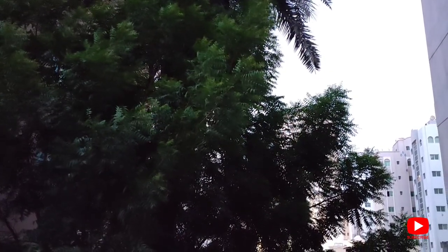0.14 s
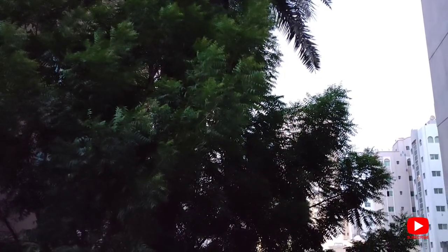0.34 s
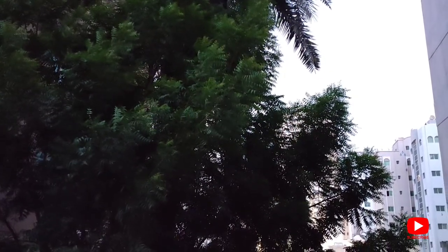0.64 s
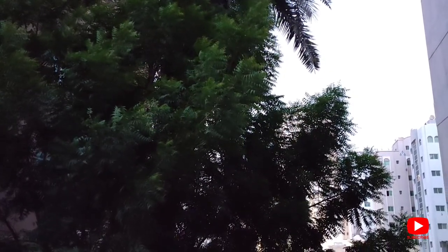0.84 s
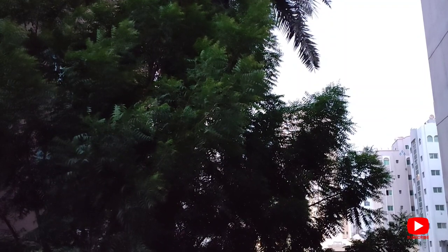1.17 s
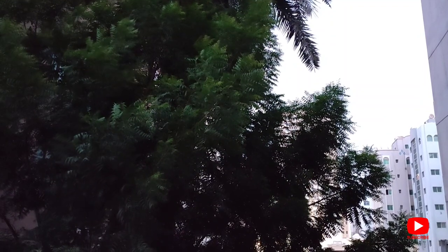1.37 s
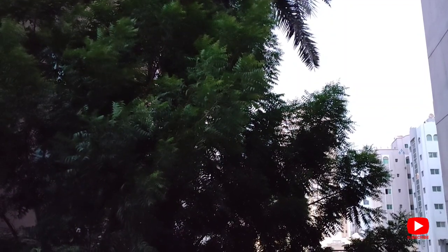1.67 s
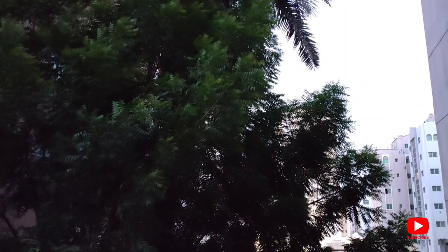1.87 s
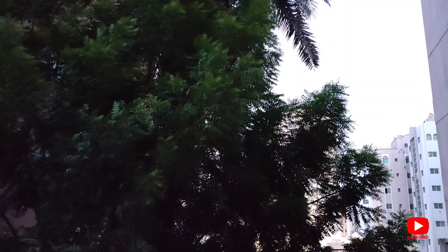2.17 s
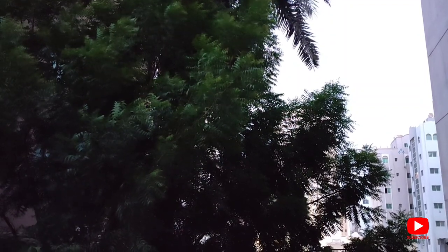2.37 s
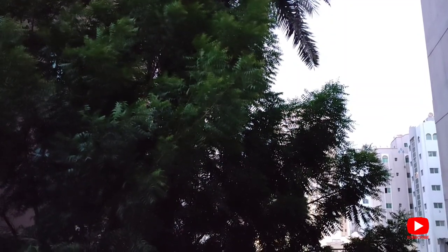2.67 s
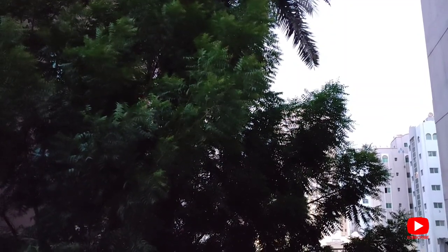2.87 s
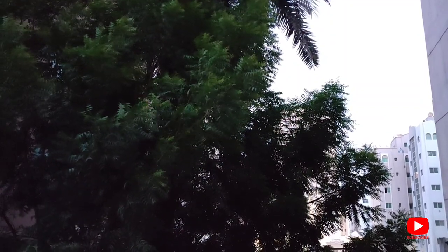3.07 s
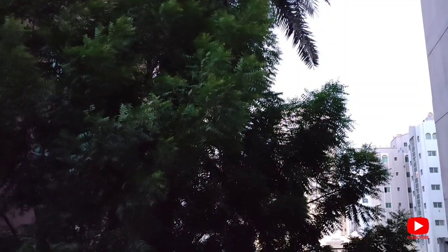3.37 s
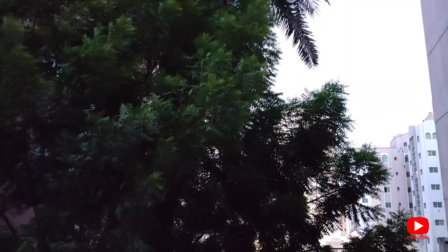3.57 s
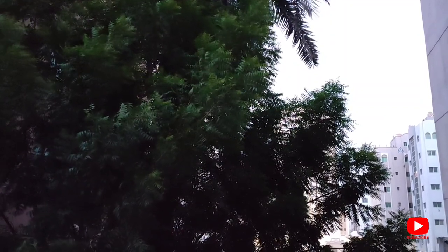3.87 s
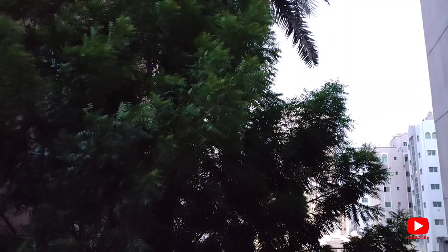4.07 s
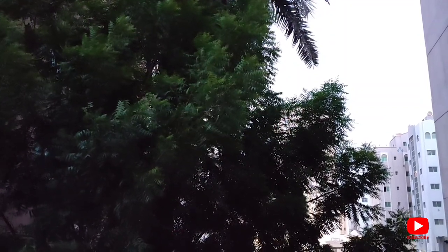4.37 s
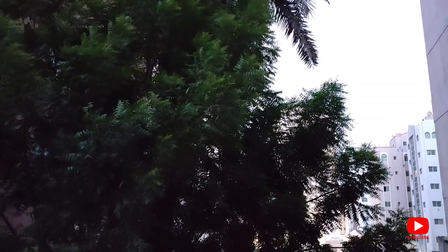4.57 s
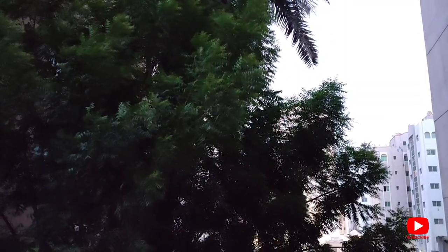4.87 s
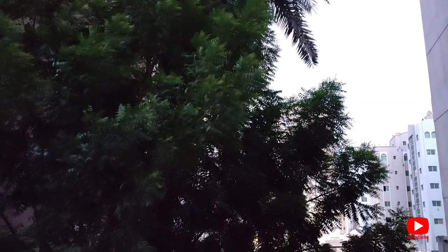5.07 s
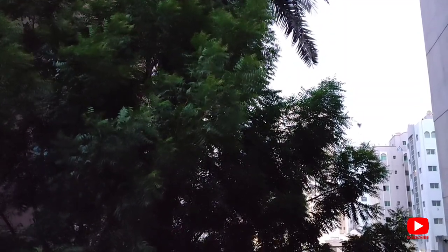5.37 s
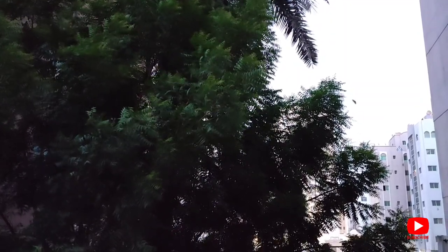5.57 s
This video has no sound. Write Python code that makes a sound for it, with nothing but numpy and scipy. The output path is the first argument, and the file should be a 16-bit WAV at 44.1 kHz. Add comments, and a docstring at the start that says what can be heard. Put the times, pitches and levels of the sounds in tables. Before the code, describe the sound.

Many sparrow-sized birds chirp without pause in leafy trees among tall apartment blocks. Near birds give quick trilled chirps and short clear whistles, mostly to the left, over a blurred, twittering far flock. Leaves and walls scatter short echoes. Beneath lie a soft low wash of distant city and a steady low air-conditioner hum. Stereo outdoor microphone, with no close handling or wind noise.

```python
"""Sparrow-sized birds chirp in trees between apartment blocks, mostly to the left of a stereo microphone.
The nearest calls, trilled or clear, are gliding tones that stand out of a far flock of chance chirps;
sparse random echoes scatter every call off leaves and walls.
Under them lie the wash of the city, made of shaped noise, and the hum of an air-conditioning unit,
made of wavering tones."""
import sys
import numpy as np
from scipy import signal
from scipy.fft import rfft, irfft
from scipy.io import wavfile
from scipy.ndimage import uniform_filter1d, map_coordinates

SR = 44100
rng = np.random.default_rng(int(sys.argv[2]) if len(sys.argv) > 2 else 0)


def unload_audio(sound):
    """Save the sound as a 16-bit wav file, at the path given as the first command line argument."""
    columns = np.transpose(np.atleast_2d(sound))
    # keep every value between -1 and 1, then stretch to whole-number steps
    steps = np.round(np.clip(columns, -1, 1) * 32767)
    wavfile.write(sys.argv[1], SR, steps.astype(np.int16))


N = 252693  # samples

# trilled chirps of the near birds, loud and faint:
# (middle [s], length [s], pitch [Hz], glide [Hz], nominal trill depth [Hz], relative level [dB])
TRILLED_CHIRPS = [(0.051, 0.097, 5660, -1360, 328, -25.5), (0.088, 0.15, 4020, -2400, 330, -24),
                  (0.138, 0.038, 4890, -80, 150, -23), (0.248, .04, 3996, -900, 120, -24),
                  (0.272, 0.065, 3690, 0, 120, -27), (0.282, 0.047, 4280, 400, 200, -20.5),
                  (0.316, 0.086, 4910, -1120, 320, -19), (0.41, 0.23, 3915, -1360, 330, -23.5),
                  (.47, .1, 3980, -500, 250, -26.5), (0.545, 0.064, 5150, 809, 150, -24),
                  (0.602, 0.11, 3890, 1600, 336, -26.5), (0.745, 0.13, 5730, -1120, 335, -20.5),
                  (0.771, 0.15, 4130, -1300, 304, -19), (1.01, .04, 3960, 0, 120, -22),
                  (1.1, .09, 3870, -500, 150, -27), (1.225, 0.092, 5740, -1680, 326, -24),
                  (1.274, 0.19, 4246, -2200, 310, -22), (1.303, 0.074, 3790, 1002, 150, -25.5),
                  (1.338, .07, 3510, -500, 199, -26), (1.405, 0.09, 4550, -650, 150, -24.5),
                  (1.516, 0.044, 4660, 10, 150, -23.5), (1.558, 0.23, 5510, 596.5, 324, -25),
                  (1.614, 0.13, 4860, 1502, 326, -23), (1.623, 0.085, 4000, 2026, 327, -27),
                  (1.793, .07, 4220, 405, 150, -37), (1.842, 0.068, 4280, 462, 323, -25.5),
                  (1.894, 0.061, 5690, -1500, 336, -21), (1.938, 0.12, 3987, 64, 340, -22.5),
                  (2.086, 0.061, 4830, 302, 149, -37), (2.199, 0.11, 3950, -900, 332, -26.5),
                  (2.367, 0.032, 6170, 200, 150, -26), (2.376, 0.066, 4100, -200, 200, -29),
                  (2.35, .04, 5400, 900, 300, -30), (2.38, 0.055, 6900, -2900, 330, -35),
                  (2.394, 0.049, 5450, 820, 150, -27), (2.42, 0.066, 3810, -600, 150, -26.5),
                  (2.614, 0.035, 5200, 190, 149, -20.5), (2.651, 0.18, 4630, -2450, 324, -24),
                  (2.685, 0.042, 4060, -300, 202, -18), (2.723, 0.11, 4000, -7, 332, -30.5),
                  (2.86, 0.073, 5110, 1200, 250, -23), (2.93, 0.13, 4280, -1700, 320, -21.5),
                  (2.953, 0.15, 5220, -1160, 330, -25), (3.037, 0.068, 4870, -160, 150, -22),
                  (3.101, 0.16, 4850, -2380, 330, -27), (3.213, 0.067, 5140, 40, 330, -23.5),
                  (3.29, .07, 3590, 203, 200, -30.5), (3.338, 0.065, 4510, 400, 249, -31),
                  (3.358, 0.088, 5670, 230, 300, -34), (3.444, 0.058, 4140, -800, 170, -23),
                  (3.581, 0.078, 5200, -590, 325, -20.5), (3.631, 0.12, 4310, -1260, 317, -18.5),
                  (3.659, 0.052, 5600, 268, 150, -23), (3.691, 0.09, 3835, -560, 333, -23.5),
                  (3.718, .09, 3980, -200, 251, -24), (3.769, 0.13, 4620, 2365, 330, -21),
                  (3.871, 0.13, 5200, 42, 324, -18), (3.964, 0.062, 4680, 1948, 326, -23),
                  (4.097, 0.043, 3680, -500, 300, -28), (4.17, .09, 3920, 198, 250, -34),
                  (4.266, 0.073, 4130, 498, 200, -26.5), (4.195, 0.047, 4540, 100, 150, -36),
                  (4.376, 0.029, 4170, 200, 150, -21), (4.403, 0.063, 4550, -1730, 326, -16),
                  (4.484, 0.16, 4210, 1190.5, 330, -24), (4.56, 0.096, 3520, -33, 147, -26.5),
                  (4.6, 0.031, 4900, 441, 151, -24.5), (4.665, 0.062, 3510, 62, 151, -28),
                  (4.78, 0.11, 5000, -1460, 340, -20.5), (4.856, 0.062, 4140, 775.5, 150, -20),
                  (4.901, 0.2, 4760, -1150, 324, -25), (4.948, 0.11, 5020, -2780, 334, -22.5),
                  (5.081, 0.1, 6260, -1300, 328, -27.5), (5.125, .12, 4520, -200, 150, -22),
                  (5.151, 0.16, 3880, -1060, 333, -20), (5.247, 0.059, 6160, 10, 332, -34.5),
                  (5.314, 0.067, 5450, 663, 333, -21), (5.349, 0.13, 3950, -2310, 316, -22.5),
                  (5.489, 0.08, 5340, 75.5, 151, -23.5), (5.566, 0.12, 4730, 1734, 151, -25),
                  (5.581, 0.08, 6920, -1760, 333, -32.5), (5.671, 0.24, 5120, -120, 336, -25)]
# clear whistles of the near birds:
# (middle [s], length [s], start pitch [Hz], middle pitch [Hz], end pitch [Hz], relative level [dB])
CLEAR_WHISTLES = [(0.208, 0.023, 5320, 4960, 4700, -20), (0.225, 0.036, 5010, 4980, 3800, -15.5),
                  (0.389, .045, 4290, 3950, 4250, -20), (0.828, 0.035, 3790, 4150, 4640, -18),
                  (0.942, 0.047, 4120, 4570, 3780, -15.5), (0.972, 0.032, 3590, 3800, 4250, -30),
                  (1.26, 0.02, 4180, 4080, 3660, -18), (1.547, .034, 4220, 4180, 4100, -21),
                  (1.828, 0.048, 5320, 5500, 5580, -29), (2.143, 0.04, 4740, 4590, 4350, -18.5),
                  (2.34, 0.025, 3670, 4300, 4950, -29), (2.462, 0.05, 3730, 3980, 4200, -18.5),
                  (2.862, .03, 4870, 5000, 5200, -21.5), (2.935, 0.034, 3880, 3550, 3230, -24),
                  (2.963, .035, 3756, 3800, 3720, -21), (3.045, .025, 4800, 4750, 4940, -26),
                  (3.118, 0.051, 3880, 4200, 4240, -22.5), (3.39, .025, 4530, 4520, 4440, -28),
                  (3.419, 0.017, 3900, 4070, 4230, -19), (3.797, 0.037, 5380, 5400, 5350, -23.5),
                  (3.87, 0.051, 4280, 4350, 4400, -23), (4.337, .025, 5870, 5950, 5850, -23),
                  (4.399, .03, 5100, 5050, 4860, -19), (4.463, 0.028, 4170, 4270, 4340, -21.5),
                  (4.477, .031, 3740, 3740, 3670, -20), (4.96, 0.067, 5380, 5500, 5450, -27),
                  (5.098, 0.032, 5200, 5390, 5460, -25.5), (5.378, 0.02, 3740, 3670, 3600, -21.5)]
# how far the city and the hum lean to one side: (frequency [Hz], left minus right [dB])
CITY_SIDE_LEAN = [(60, 1), (200, 1.5), (380, 3.5), (700, 1.5), (1300, 0.6), (2500, -2.5)]


def gain_of(db):
    """Amplitude factor of a level in dB."""
    return 10 ** (np.asarray(db) / 20)


def evened(x):
    """The sound scaled to rms 1."""
    return x / np.sqrt(np.mean(x ** 2) + 1e-20)


def read(points, hz):
    """Value of a curve at hz, drawn straight between its points over log frequency."""
    f, value = np.transpose(points)
    return np.interp(np.log(hz + 1), np.log(f + 1), value)


def follow(points):
    """Value of a (time, value) curve at every sample."""
    s, value = np.transpose(points)
    return np.interp(np.arange(N) / SR, s, value)


def add(mix, s, sound):
    """Lay a sound into the mix from time s on, cut at both ends of the mix."""
    at = round(s * SR)
    part = mix[..., max(at, 0):max(at + sound.shape[-1], 0)]
    part += sound[..., max(-at, 0):][..., :part.shape[-1]]


def sides(lean_db):
    """Left and right gains of a sound that leans left by lean_db."""
    return gain_of(np.multiply.outer([.5, -.5], lean_db))


def wander(count, hz):
    """Smooth chance of rms near 1 that changes about hz times a second."""
    knots_per_sample = 2 * hz / SR
    knots = rng.standard_normal(int(count * knots_per_sample) + 4)
    return map_coordinates(knots, [1 + np.arange(count) * knots_per_sample], order=3)


def chirp(length, start_hz, middle_hz, end_hz, depth_hz):
    """A whistle on a curved glide; it trills about 45 to 80 times a second and flutters faster on top."""
    # overtones of a clear call: (multiple of the pitch, level [dB])
    overtone_levels = [(2, -37), (3, -48)]
    harsh_db_per_hz = 0.0184  # deeper trills have stronger overtones
    hiss_db = -36  # air rushing past the membranes, under the whistle
    count = int(length * SR)
    u = np.linspace(-1, 1, count)
    bend_hz = (start_hz + end_hz) / 2 - middle_hz
    glide = middle_hz + (end_hz - start_hz) * u / 2 + bend_hz * u ** 2

    trill_hz = rng.uniform(45, 80)
    beat = 2 * np.pi * (trill_hz * np.arange(count) / SR + rng.random())
    beat += 1.8 * wander(count, hz=30)
    flutter = .3 * wander(count, hz=260)
    pitch = glide + depth_hz * (1.15 * np.sin(beat) + flutter)
    phase = 2 * np.pi * np.cumsum(pitch) / SR

    tone = np.sin(phase)
    for multiple, db in overtone_levels:
        tone += gain_of(db + harsh_db_per_hz * depth_hz) * np.sin(multiple * phase)
    tone += gain_of(hiss_db) * rng.standard_normal(count)
    rasp = gain_of(1.5 * wander(count, hz=150))
    rasp *= gain_of(.01 * depth_hz * np.cos(beat))  # the rising strokes of a trill are the loud ones
    fade = np.cos(np.pi / 2 * u) ** 0.81
    return evened(tone * rasp) * fade


def scatter(x, t60, wet_db):
    """Direct sound plus sparse echoes off leaves and walls, other ones for every path and side."""
    count = int(.6 * SR)
    shape = x.shape[:-1] + (count,)
    taps = rng.choice([-1., 1.], shape) * (rng.random(shape) < .06)
    taps *= gain_of(-60 * np.arange(count) / SR / t60)
    taps *= gain_of(wet_db) / np.linalg.norm(taps, axis=-1, keepdims=True)
    arrival = rng.integers(0, 50, x.shape[:-1] + (1,))  # samples; the sides are reached a little apart
    np.put_along_axis(taps, arrival, 1, axis=-1)
    wet = signal.fftconvolve(x, taps, axes=-1)[..., :N]
    return wet / np.sqrt(1 + gain_of(2 * wet_db))


def with_neighbours():
    """The trilled chirps; each loud one has a fainter, higher call close to it in time."""
    join_above_db, join_db = -24, -18  # level that draws a neighbour; neighbour's level beside the chirp
    lowest_hz, range_octaves, widest_glide_hz = 6250, .36, 1178
    within_s = 0.078  # span centred on the loud chirp
    calls = list(TRILLED_CHIRPS)
    chances = rng.random((len(TRILLED_CHIRPS), 3))
    for (s, length, _, _, depth_hz, db), (late, pitch, glide) in zip(TRILLED_CHIRPS, chances):
        if db > join_above_db:
            middle_s = s + within_s * (late - .5)
            hz = lowest_hz * 2 ** (range_octaves * pitch)
            glide_hz = widest_glide_hz * (2 * glide - 1)
            calls.append((middle_s, max(length, .07), hz, glide_hz, max(depth_hz, 330), db + join_db))
    return calls


def near_birds():
    """Clear whistles come from two open perches, trills from three perches deep in the leaves."""
    # how far the near calls lean left: (pitch [Hz], left minus right [dB])
    near_side_lean = [(3300, 13.5), (3900, 8.5), (4600, 4.5), (5500, 7.5), (6500, 11), (8000, 16.5)]
    lean_spread_db = 4  # full width of the chance spread
    waver_hz = 25  # nominal trill depth of a clear whistle
    sag = .06  # a gliding trill lingers near its low end: drop of the middle as a share of the glide
    beak_hz = 3260  # throat and beak radiate little below this
    perches = np.zeros((5, 2, N))
    calls = []
    for k, (s, length, start, middle, end, db) in enumerate(CLEAR_WHISTLES):
        calls.append((k % 2, s, length, start, middle, end, waver_hz, db))
    for k, (s, length, hz, glide, depth, db) in enumerate(with_neighbours()):
        middle = hz - sag * abs(glide)
        calls.append((2 + k % 3, s, length, hz - glide / 2, middle, hz + glide / 2, depth, db))

    for (perch, s, length, start, middle, end, depth, db), place in zip(calls, rng.random(len(calls))):
        lean_db = read(near_side_lean, middle) + lean_spread_db * (place - .5)
        call = gain_of(db) * chirp(length, start, middle, end, depth)
        add(perches[perch], s - length / 2, sides(lean_db)[:, None] * call)

    open_air = scatter(perches[:2], t60=.05, wet_db=-6.0).sum(0)
    leafy = scatter(perches[2:], t60=.06, wet_db=1.5).sum(0)
    # the blocks throw the calls back
    walls = gain_of(-12) * scatter(open_air + leafy, t60=0.46, wet_db=20.0)
    beak = signal.butter(4, beak_hz, "high", fs=SR, output="sos")
    return signal.sosfilt(beak, open_air + leafy + walls)


def stir_db():
    """How far the flock swells around the loud near calls: a share of their summed power in dB."""
    share, from_db, spread_s = 0.48, -34.5, 0.054
    rows = TRILLED_CHIRPS + CLEAR_WHISTLES
    s, length, db = np.transpose([(row[0], row[1], row[-1]) for row in rows])
    t = np.arange(0, N / SR + .01, .005)
    bumps = np.exp(-((t[:, None] - s) / (length / 3 + spread_s)) ** 2)
    near = (gain_of(db - from_db) ** 2 * bumps).sum(axis=1)
    return np.interp(np.arange(N) / SR, t, share * 10 * np.log10(1 + near))


def far_flock():
    """Many chance chirps, mostly falling, blurred by short echoes and coloured by the trees."""
    # liveliness of the far flock before it swells with the near calls: (time [s], level [dB])
    flock_levels = [(0, -31), (.17, -36.5), (.3, -35.5), (.56, -29.5), (.67, -34), (0.879, -33),
                    (1.1, -34.5), (1.16, -35.5), (1.401, -35), (1.63, -28), (1.71, -34), (1.8, -29),
                    (2.1, -31), (2.31, -34.5), (2.421, -32.5), (2.52, -37.5), (2.62, -33), (2.9, -28.5),
                    (3.2, -33.5), (3.42, -33), (3.5, -36), (3.75, -32.5), (4.05, -31.5), (4.28, -30),
                    (4.65, -30.5), (4.71, -31.5), (4.85, -33), (5.01, -33.5), (5.3, -28.5), (5.73, -32)]
    # spectrum of the far flock: (frequency [Hz], relative density [dB per Hz])
    flock_spectrum = [(1710, -41), (2900, -20.5), (3500, -10.5), (4150, -3), (4910, -8), (5310, -8.5),
                      (6410, -12), (6930, -18.5), (7920, -16), (8400, -23), (8900, -27.5), (9640, -31.5),
                      (12700, -30.5), (14100, -36), (15500, -75)]
    # how far the flock leans left: (frequency [Hz], left minus right [dB])
    flock_side_lean = [(2500, 12.5), (4400, 8), (8100, 12), (11000, -1.5), (15000, 6)]
    calls_per_s, span_s = 260, 6
    trees = np.zeros((6, N))
    draws = rng.random((calls_per_s * span_s, 5))
    slots = np.arange(len(draws))  # chance draws are stratified, so calls spread evenly over time and pitch
    draws[:, 0] = (slots + draws[:, 0]) / len(draws)
    draws[:, 2] = (slots * 5 % 12 + draws[:, 2]) / 12
    for k, (when, long, pitch, glide, size) in enumerate(draws):
        hz = 2950 * 2.9 ** pitch
        sweep_hz = (1100 + 300 * pitch) * (glide - .65)
        length, depth_hz = .022 + .05 * long, 40 + 200 * pitch
        loud = gain_of(11.0 * size ** 3)  # a few birds sit closer
        call = loud * chirp(length, hz - sweep_hz / 2, hz + 100, hz + sweep_hz / 2, depth_hz)
        add(trees[k % len(trees)], span_s * when - .2, call)

    both_sides = np.repeat(trees[:, None], 2, axis=1)
    blurred = scatter(both_sides, t60=.16, wet_db=3.0).sum(0)
    spectrum, hz = rfft(blurred), np.fft.rfftfreq(N, 1 / SR)
    # flatten the broad spectrum, then give it the flock's colour
    flat = spectrum / np.sqrt(uniform_filter1d(abs(spectrum) ** 2, size=1500, axis=1) + 1e-9)
    coloured = flat * gain_of(read(flock_spectrum, hz)) * sides(read(flock_side_lean, hz))
    return evened(irfft(coloured, N)) * gain_of(follow(flock_levels) + stir_db())


def birds():
    """Near and far birds together; their treble waxes and wanes, and swells with the loud near calls."""
    # brightness of the birds, before the swell: (time [s], treble level [dB])
    treble_levels = [(0, 1.5), (.6, -5.5), (.8, 1.5), (1.3, 0), (2, 1), (2.5, 2.5), (2.9, 0.5), (3.3, 1),
                     (3.9, 0.5), (4.5, -0.5), (5.1, 2), (5.73, 0.5)]
    treble_hz, stir_share = 8300, 0.34  # treble edge; share of the flock's swell
    both = near_birds() + far_flock()
    high_pass = signal.firwin(201, treble_hz, pass_zero=False, fs=SR)
    treble = signal.oaconvolve(both, high_pass[None], "same")
    stir = stir_db()
    swell_db = stir_share * (stir - stir.mean())
    return both + treble * (gain_of(follow(treble_levels) + swell_db) - 1)


def city():
    """Distant traffic and fans: smooth noise with faint drifting patches, nearly mono in the bass."""
    # spectrum of the city wash: (frequency [Hz], relative density [dB per Hz])
    city_spectrum = [(19, -39), (32, -4), (101, -4.5), (145, -6.5), (199, -7), (245, -6.5), (393, -8.5),
                     (746, -15), (1070, -14), (1170, -19), (1620, -20), (2540, -28.5), (3100, -30.5),
                     (3900, -40), (6380, -90)]
    # likeness of the two sides: (frequency [Hz], left-right correlation [-1 to 1])
    side_likeness = [(40, 0.75), (60, 0.81), (100, 1), (180, 0.88), (310, 1), (550, 0.64), (950, -0.19),
                     (1650, -0.015), (2860, 0.15), (4970, -0.087), (8640, -0.02), (15000, -0.02)]
    level_db = -28  # rms over both sides
    frames, hz = N // 512 + 5, np.fft.rfftfreq(2048, 1 / SR)
    a, b, c, d, patches = rng.standard_normal((frames, len(hz), 5)).T
    patches = uniform_filter1d(patches, size=10, axis=0)  # over frequency
    patches = evened(uniform_filter1d(patches, size=8, axis=1))  # over time
    same = read(side_likeness, hz)[:, None]
    left, other = a + 1j * b, c + 1j * d
    z = np.array([left, same * left + np.sqrt(1 - same ** 2) * other])
    z *= gain_of(read(city_spectrum, hz)[:, None] + 1.22 * patches)
    z *= sides(read(CITY_SIDE_LEAN, hz))[..., None]
    wash = signal.istft(z, nperseg=2048, noverlap=1536)[1][:, :N]
    return gain_of(level_db) * evened(wash)


def hum():
    """Motor tones whose phase and level waver a little, and one fading tone of unsteady pitch."""
    # lasting motor tones: (frequency [Hz], rms level before the side lean [dB], waver rate [Hz])
    motor_tones = [(99.4, -43, 4.9), (195.5, -31.5, 2.583), (293.3, -42.5, 4.0), (1074, -51.5, 1.02)]
    # a faint tone that fades: (time [s], mean frequency [Hz], peak level [dB])
    fading_tone = [(0, 950, -49), (.35, 936, -40), (.55, 917, -49), (.7, 925, -86)]
    t, out = np.arange(N) / SR, np.zeros((2, N))
    for hz, db, waver_hz in motor_tones:
        tone = np.sin(2 * np.pi * hz * t + 0.4 * wander(N, waver_hz))
        tone *= gain_of(1.2 * wander(N, waver_hz))
        out += gain_of(db) * evened(tone) * sides(read(CITY_SIDE_LEAN, hz))[:, None]
    s, hz, db = np.transpose(fading_tone)
    pitch = np.interp(t, s, hz) + 6.4 * wander(N, hz=13.6)
    return out + gain_of(np.interp(t, s, db)) * np.sin(2 * np.pi * np.cumsum(pitch) / SR)


def scene():
    """Birds over the city and the hum, as they meet at the microphone."""
    return birds() + city() + hum()


def record(dry):
    """The band limit of the recorder: a steep low-pass."""
    edge_hz = 15700
    low_pass = signal.firwin(511, edge_hz, window=("kaiser", 9), fs=SR)
    return signal.oaconvolve(dry, low_pass[None], "same")


dry = scene()
out = record(dry)
unload_audio(out)
```